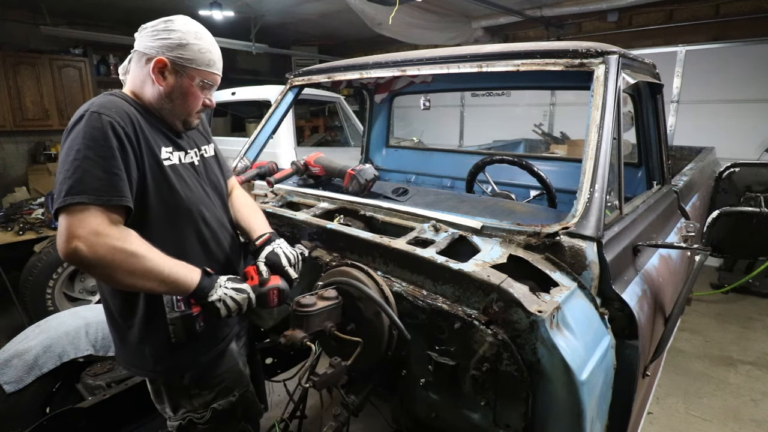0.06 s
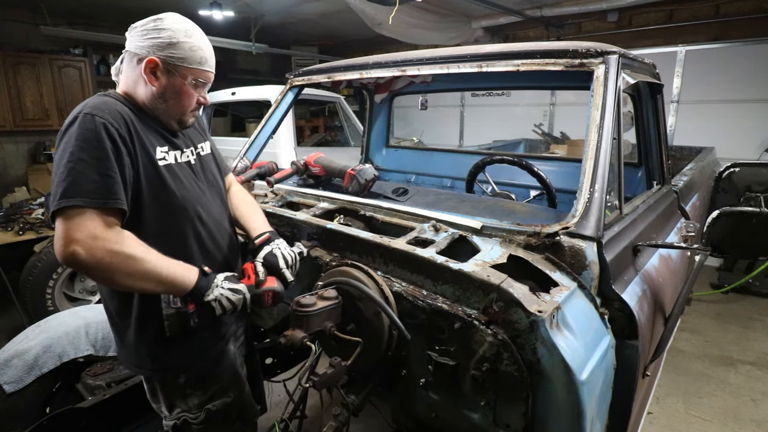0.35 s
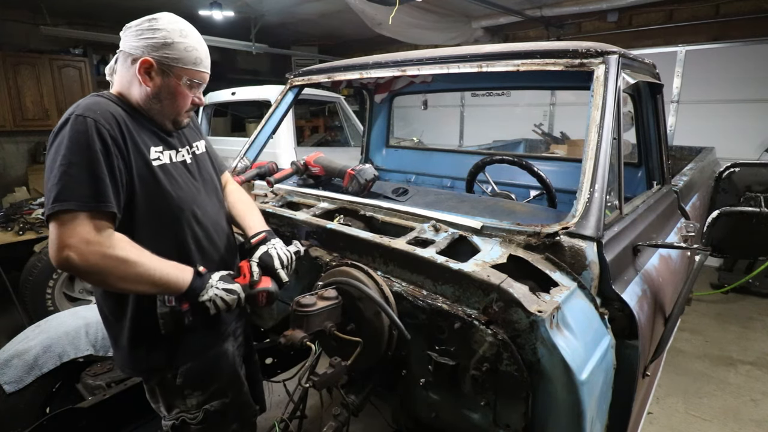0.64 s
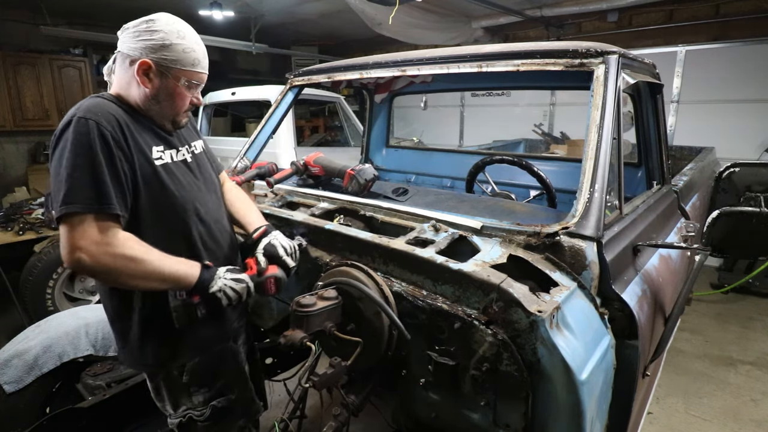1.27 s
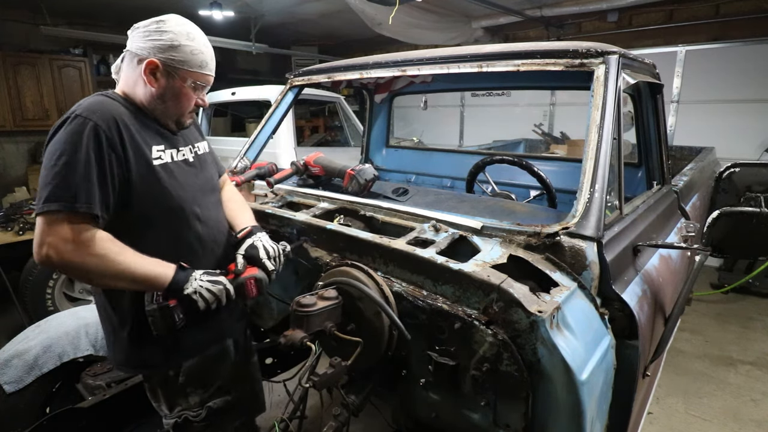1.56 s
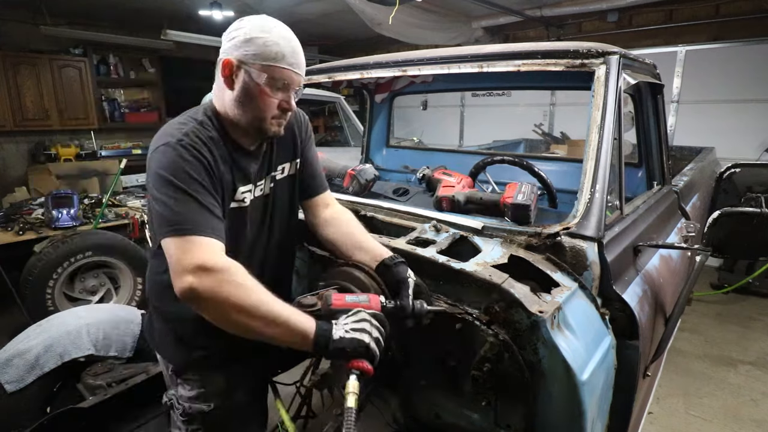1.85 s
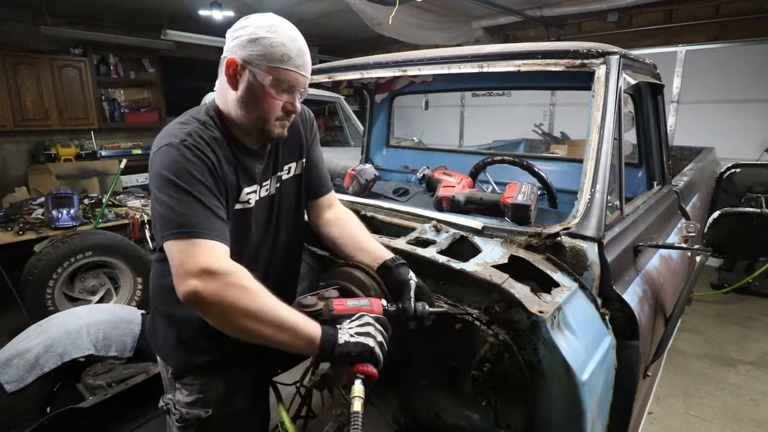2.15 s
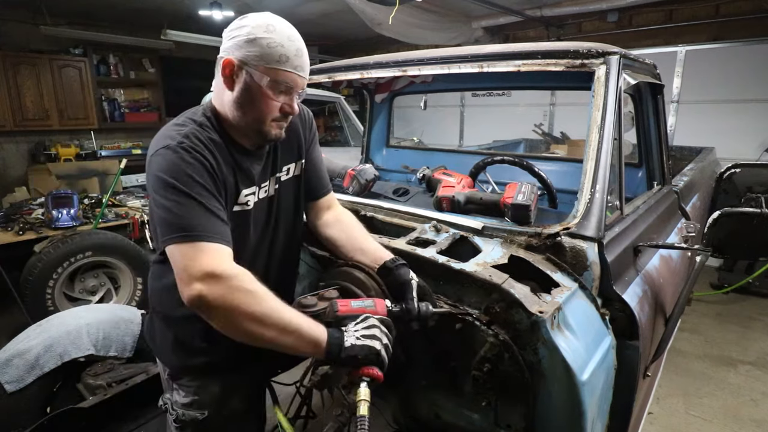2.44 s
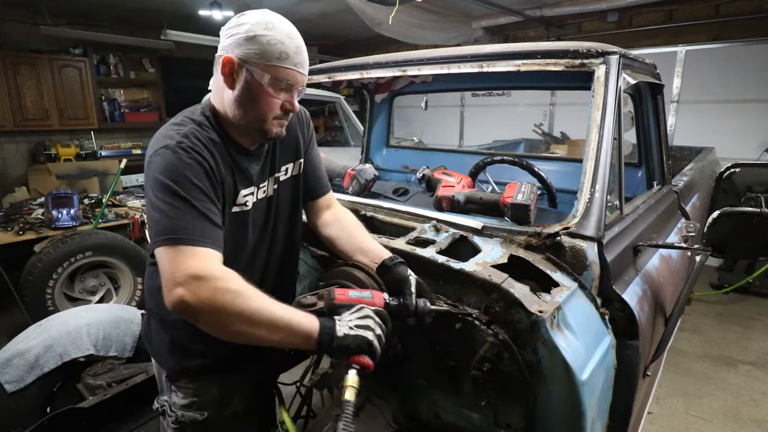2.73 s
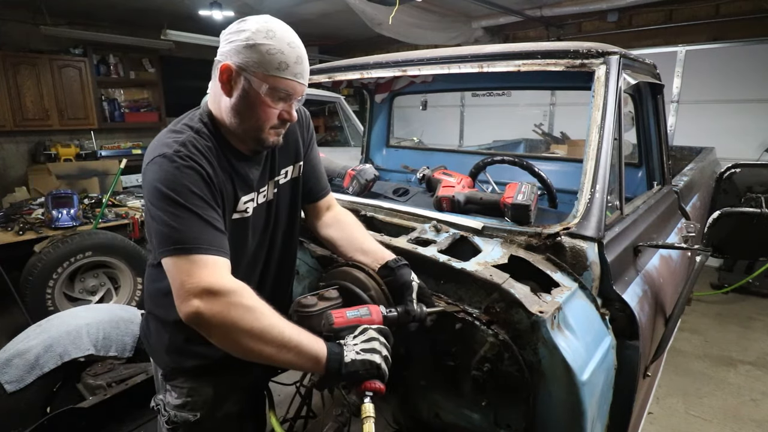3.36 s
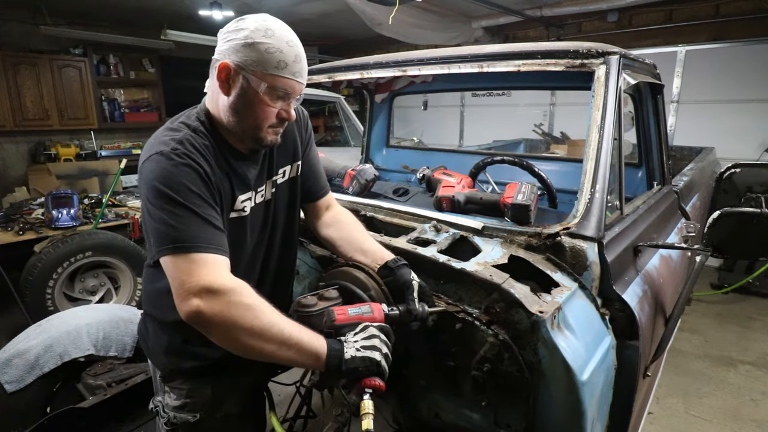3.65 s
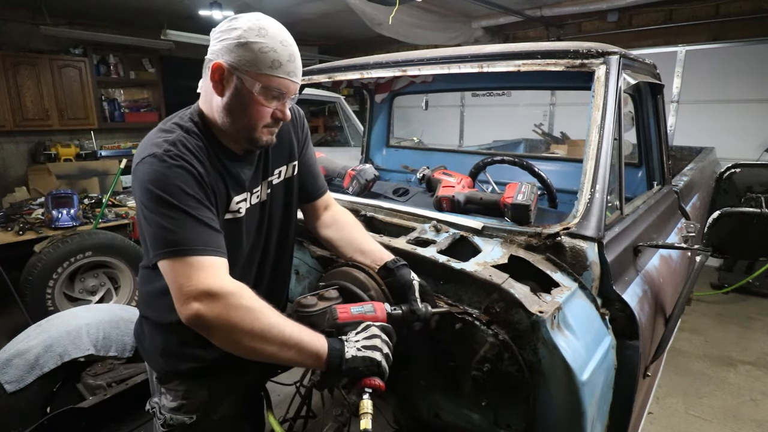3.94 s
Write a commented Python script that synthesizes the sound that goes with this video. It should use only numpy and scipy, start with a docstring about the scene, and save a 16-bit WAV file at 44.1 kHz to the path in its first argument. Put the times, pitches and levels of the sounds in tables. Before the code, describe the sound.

An air hammer pounding a steel truck panel follows a stretch of sawing in a briefly echoing garage. From the start, a reciprocating saw chatters, rasps and squeals through sheet metal, snags with several knocks from 1.2 seconds and stops near 1.6. The hammer rattles briefly at 2 seconds, again from 2.3 to 2.7, and from 3 to 4, with booming blows, chisel clangs and spits of air.

```python
"""An air hammer drives its chisel into a rusty truck panel in three bursts.
Each blow booms the panel, cracks steel on steel and lets out a puff of air.
Before the hammer, a reciprocating (back-and-forth) saw chatters through sheet steel, snags and runs down.
The garage rings briefly over a faint background rumble, and a limiter rounds off the loudest peaks."""
import sys
import numpy as np
from scipy import signal
from scipy.fft import rfft, irfft
from scipy.io import wavfile
from scipy.ndimage import uniform_filter1d, minimum_filter1d

SR = 44100
rng = np.random.default_rng(int(sys.argv[2]) if len(sys.argv) > 2 else 0)


def output_pcm(signal):
    """Save a mono or channel-first signal as 16-bit PCM at the path in sys.argv[1].

    Samples are clipped to [-1, 1] before scaling.
    """
    pcm = np.clip(np.atleast_2d(signal).T, -1, 1) * 32767
    wavfile.write(sys.argv[1], SR, np.round(pcm).astype(np.int16))


N = 176400
TIME = np.arange(N) / SR

# Table levels are relative. A "tone" says how strong a noise is from bass to treble.
# A fade_s is the time a sound takes to drop by 60 dB.
# Tone of the background: frequency_hz, level_db
BACKGROUND_TONE = [(25, 0), (60, -4.5), (150, 1), (400, -8), (1500, -12), (4000, -22), (15000, -32)]
# How long the garage rings: frequency_hz, fade_s
GARAGE_FADE = [(80, 0.8), (190, 1), (400, 0.56), (800, 0.42), (2000, 0.43), (5000, 0.41), (13000, 0.31)]

# How fast the saw runs: time_s, strokes_per_s
SAW_SPEED = [(0, 41.3), (.3, 40.8), (.5, 38.7), (.75, 38), (1.08, 37.9), (1.2, 35.3), (1.3, 34),
             (1.45, 33.5), (1.6, 24)]
# How loud the parts of the sawing are: time_s, rumble_db, squeal_db, rasp_db
SAW_LEVELS = [(0, -18, -22.5, -24.5), (.12, -23, -13.5, -23), (.3, -20, -18, -24.5),
              (.36, -22.5, -18, -26.5), (.56, -22, -17.5, -24.5), (.65, -20, -14.5, -25),
              (.78, -19, -16, -25), (1.16, -22, -15, -28), (1.28, -19.5, -27, -28), (1.4, -17, -20, -25),
              (1.43, -32, -43, -32), (1.48, -24.5, -44, -25), (1.53, -26, -67, -29.5),
              (1.58, -37, -19, -40)]
# The squealing blade: time_s, pitch_hz
SQUEAL_PITCH = [(0.0, 1120), (0.15, 1108), (0.29, 1086), (0.42, 1100), (0.55, 1003), (0.65, 1070),
                (0.71, 1173), (0.93, 1073), (1.08, 1113), (1.17, 1007), (1.4, 980)]
# How loud the blade ticks: time_s, level_db
TICK_LEVEL = [(0, -28), (.25, -35), (.5, -26), (.74, -29.5), (1.05, -27), (1.35, -20), (1.5, -29)]
# Notes the sawn sheet likes to ring at: pitch_hz, width_hz, level_db
SHEET_NOTES = [(327.5, 32, 3), (417, 19, 1), (483, 54, -8), (594, 47, -5), (994, 17, 4), (1150, 11, -6)]
# The blade snags and knocks: start_s, thud_db, clash_db
SNAGS = [(1.1522, -5.5, -5), (1.2049, -3, -2), (1.2711, -14, -19), (1.332, -11, -10.5), (1.381, -8.5, -3),
         (1.4376, -5.5, -10), (1.563, -14, -11), (1.6056, -9.5, -6), (1.659, -28, -22), (1.8348, -28, -37)]
# Short notes ring from the sheet; a low hum lingers in the garage after the saw stops:
# start_s, pitch_hz, level_db, fade_s
RINGING_NOTES = [(1.308, 583, -9, 0.1), (1.441, 527, -9.5, 0.034), (1.46, 205, -14.5, 0.061),
                 (1.612, 533, -16.5, 0.13), (1.69, 163, -40, 0.46), (1.838, 556, -39, 0.12)]
# Tones of the sawing noises: frequency_hz, level_db
RUMBLE_TONE = [(35, -41), (55, -35), (85, -7.5), (130, -6), (200, 4), (260, -3), (340, -0.5), (600, 4),
               (800, 2.5), (1400, -3), (2000, -34)]  # shaking panel
RASP_TONE = [(700, -28), (1500, -1), (2300, 3.5), (2850, 2), (3100, -3), (3700, -2.5), (5000, -11),
             (6000, -17.5), (7400, -19), (8100, -13.5), (9500, -19), (14000, -28), (16000, -43)]  # dragging teeth
TICK_TONE = [(3000, 4.5), (8000, 3), (11500, 0), (14200, -2), (16000, -17)]  # blade turning back
THUD_TONE = [(50, -34), (110, 5.5), (300, 1.5), (530, 2), (900, -1), (1500, -5.5), (4000, -13), (6000, -28),
             (16000, -57)]  # dull part of a snag
CLASH_TONE = [(500, -9), (2000, 6), (4200, 10), (6000, -1), (8500, -0.5), (12000, -5), (14200, -11),
              (16000, -16)]  # bright part of a snag

# The trigger lets air in: start_s, level_db
AIR_SPITS = [(1.98, -17), (2.245, -25), (2.998, -22)]
# The air valve chirps: start_s, pitch_hz, level_db
VALVE_CHIRPS = [(1.988, 1420, -22.5), (2.017, 1460, -23), (2.245, 1550, -22.5), (3.004, 1020, -24.5),
                (3.039, 1080, -15)]
# The chisel clicks in its holder: start_s, level_db
CHISEL_CLICKS = [(2.1984, -10), (2.7584, -7)]
# The chisel clangs when it is not pressed home: start_s, level_db
CHISEL_CLANGS = [(2.0036, -3), (2.034, -9), (2.1224, 0), (2.264, -0.5), (2.702, -4.5), (3.023, 2.5),
                 (3.058, -7), (3.248, -2)]
# Notes of the loose chisel: pitch_hz, level_db, fade_s
CHISEL_NOTES = [(760, -3.5, 0.032), (1188, -18, 0.061), (1630, -20, 0.022), (2580, -20, 0.018)]
# Notes of the hammered panel: pitch_hz, level_db, fade_s
PANEL_NOTES = [(127.5, -16, 0.043), (219.3, 1, 0.062), (362, -5.5, 0.034), (407, -11.5, 0.064),
               (439.3, -5, 0.048), (639, -10, 0.072), (760, -4.5, 0.027), (1266, -23, 0.17)]
# Hammer speed, one list for each burst: time_s, blows_per_s
HAMMER_BURSTS = [
    [(2.0037, 35.6), (2.032, 37.3), (2.059, 36.8), (2.086, 30.6), (2.125, 30)],
    [(2.2619, 34.1), (2.291, 36.6), (2.4, 36.8), (2.452, 43.5), (2.475, 44.2), (2.566, 44.2), (2.612, 39.7),
     (2.665, 30.7), (2.705, 30)],
    [(3.0214, 28.9), (3.056, 32.5), (3.149, 32.1), (3.212, 29.2), (3.247, 31.8), (3.278, 39), (3.33, 40.9),
     (3.452, 39.9), (3.477, 36.5), (3.56, 35.3), (3.73, 35.2), (3.84, 37), (3.87, 39), (4, 39.3)],
]
# How hard the blows land: time_s, boom_db, crack_db
BLOW_FORCE = [(2.0, 0, -2.5), (2.04, -3, -6), (2.085, 2, -1), (2.12, -7, -5), (2.26, -8.5, -7),
              (2.3, 3, -5.5), (2.46, 3.5, -1), (2.66, 3.5, -3), (2.7, -4, -7), (3.02, -1, -2.5),
              (3.06, 2.5, -6), (3.24, 3, -4.5), (3.32, 3.5, -3.5), (3.7, 3.5, -3.5), (4, 0, -2)]
# How much of the noise repeats from blow to blow: frequency_hz, share_0_to_1
REPEAT_SHARE = [(500, 0.86), (1200, 0.55), (3000, 0.25), (8000, 0.05)]
# Tones of the hammer's noises: frequency_hz, level_db
CLICK_TONE = [(150, 14.5), (750, 7.5), (2000, 2), (4200, -5.5), (6000, -1), (8000, -4.5), (11100, 2),
              (11900, -11), (16000, -11)]  # chisel in its holder
CLANG_TONE = [(250, 1), (780, 2), (1050, 3), (1600, -3.5), (4000, -11), (16000, -24)]  # noisy part of a clang
CLATTER_TONE = [(60, -40), (150, -20), (300, 0), (450, 2.5), (800, 3.5), (1100, -2), (1800, -4),
                (4000, -10.5), (5500, -15.5), (16000, -28)]  # struck panel
PING_TONE = [(2500, -1), (4500, -4.5), (9000, 12.5), (16000, -1)]  # piston meeting the chisel
CRACK_TONE = [(800, 8.5), (2500, -11), (4200, 10), (5500, -14.5), (6500, 0.5), (8000, 6), (10500, 2),
              (12500, 2.5), (15700, 3)]  # steel on steel
EXHAUST_TONE = [(500, -2), (1300, 29.5), (2500, -9), (5500, 3), (12000, -23.5), (15700, 2)]  # air going out
SPIT_TONE = [(100, 9), (800, 7.5), (1400, 5), (2200, -4),  # air coming in
             (5000, -9), (6500, -4), (9000, -6), (16000, -12)]


def amp(db):
    """Turns decibels into a number to multiply a sound by."""
    return 10 ** (np.asarray(db) / 20)


def evened(x):
    """Scales a sound to an average (rms) level of 1."""
    return x / np.sqrt(np.mean(x ** 2) + 1e-20)


def curve(rows, t, column=1):
    """Reads one column of a table at time t, sliding between rows."""
    rows = np.array(rows)
    return np.interp(t, rows[:, 0], rows[:, column])


def at_frequency(rows, hz):
    """Reads a table at a frequency, spacing the rows by octaves."""
    row_hz, value = np.transpose(rows)
    return np.interp(np.log(hz + 1), np.log(row_hz), value)


def colour(x, tone):
    """Gives a sound a tone, at an average level of 1."""
    gain = amp(at_frequency(tone, np.fft.rfftfreq(len(x), 1 / SR)))
    return evened(irfft(rfft(x) * gain, len(x)))


def add(mix, start_s, sound):
    """Mixes a sound in at its start time."""
    part = mix[max(round(start_s * SR), 0):][:len(sound)]
    part += sound[:len(part)]


def puff(tone, rise_s, fade_s, size=8192):
    """A burst of noise that rises quickly and dies away."""
    t = TIME[:size]
    return colour(rng.standard_normal(size), tone) * np.minimum(t / rise_s, 1) * 1e3 ** (-t / fade_s)


def ring(notes, size=8192):
    """Pure notes that start at once and die away."""
    t = TIME[:size]
    return sum(amp(db) * 1e3 ** (-t / fade_s) * np.sin(2 * np.pi * hz * t) for hz, db, fade_s in notes)


def resonate(x, pitch_hz, width_hz):
    """Makes a sound ring around a steady or moving pitch."""
    turn = np.exp(2j * np.pi * np.cumsum(np.broadcast_to(pitch_hz, N)) / SR)
    decay = np.exp(-np.pi * width_hz / SR)
    return 2 * (turn * signal.lfilter([1 - decay], [1, -decay], x / turn)).real


def background(level_db=-58):
    """The faint, steady rumble of the quiet garage."""
    return amp(level_db) * colour(rng.standard_normal(N), BACKGROUND_TONE)


def garage(x, echo_db, delay_s):
    """Adds many small echoes; the bass lingers longer than the treble."""
    echoes = np.zeros(SR)
    slots = np.arange(0, SR - 20, 20)
    echoes[slots + rng.integers(0, 20, len(slots))] = rng.choice([-1., 1.], len(slots))
    hz, t, bands = signal.stft(echoes, SR, nperseg=256)
    fade = 1e3 ** (-t / at_frequency(GARAGE_FADE, hz)[:, None])
    tail = signal.istft(bands * fade, SR)[1]
    tail *= np.clip(TIME[:len(tail)] / delay_s - 1, 0, 1)
    return x + amp(echo_db) * signal.fftconvolve(x, tail / np.linalg.norm(tail))[:N]


def sheet_ring(x):
    """The steel sheet rings at its own notes when shaken."""
    return sum(amp(db) * resonate(x, hz, width_hz) for hz, width_hz, db in SHEET_NOTES)


def snags():
    """The blade catches and bangs, short notes ring from the sheet, and a low hum lingers."""
    knocks, notes = np.zeros((2, N))
    for start_s, thud_db, clash_db in SNAGS:
        add(knocks, start_s, amp(thud_db - 8.5) * puff(THUD_TONE, rise_s=0.002, fade_s=0.093))
        add(knocks, start_s, amp(clash_db - 14) * puff(CLASH_TONE, rise_s=0.00075, fade_s=0.063))
    for start_s, hz, db, fade_s in RINGING_NOTES:
        add(notes, start_s, ring([(hz, db, fade_s)]))
    return notes + knocks + amp(-6.5) * sheet_ring(knocks)


def scrape(strokes, alike, depth, size=1024):
    """Teeth drag over the edge, out and back, partly the same way on every stroke."""
    pattern = evened(irfft(np.exp(2j * np.pi * rng.random(size // 2 + 1))))
    repeating = evened(np.interp(strokes % 1, np.arange(size) / size, pattern))
    friction = np.sqrt(alike) * repeating + np.sqrt(1 - alike) * rng.standard_normal(N)
    blade_speed = abs(np.sin(2 * np.pi * strokes))
    return friction * (1 - depth + depth * blade_speed ** 2)


def saw(stop_s=1.57, release_s=0.02):
    """The strokes shake the panel and make the blade squeal, rasp and tick."""
    strokes = np.cumsum(curve(SAW_SPEED, TIME)) / SR - 0.41  # starts partway through a stroke
    rumble_db, squeal_db, rasp_db = (curve(SAW_LEVELS, TIME, column) for column in (1, 2, 3))
    rumble = amp(rumble_db - 0.5) * colour(scrape(strokes, alike=0.32, depth=0.3), RUMBLE_TONE)
    pitch_hz = curve(SQUEAL_PITCH, TIME)
    blade = resonate(scrape(strokes, alike=0.2, depth=0.63), pitch_hz, width_hz=156)
    squeal = amp(squeal_db - 2.5) * evened(resonate(blade, pitch_hz, width_hz=430))
    rasp = amp(rasp_db + 0.5) * colour(scrape(strokes, alike=0.16, depth=0.42), RASP_TONE)
    ticks = np.zeros(N)
    whole_strokes = np.floor(strokes[:round(stop_s * SR)])
    for start_s in np.flatnonzero(np.diff(whole_strokes)) / SR:
        tick_db = curve(TICK_LEVEL, start_s) + 2 * rng.standard_normal()
        add(ticks, start_s, amp(tick_db) * puff(TICK_TONE, rise_s=0.0015, fade_s=0.035))
    shaking = rumble + squeal
    running = np.exp(-np.maximum(TIME - stop_s, 0) / release_s)
    return (amp(-1.5) * (shaking + sheet_ring(shaking)) + rasp + ticks) * running


def handling():
    """Air spits in as the trigger opens; the chisel clicks when the hammer is eased off."""
    out = np.zeros(N)
    for start_s, db in AIR_SPITS:
        add(out, start_s, amp(db) * puff(SPIT_TONE, rise_s=0.011, fade_s=0.077))
    for start_s, db in CHISEL_CLICKS:
        add(out, start_s, amp(db - 7) * puff(CLICK_TONE, rise_s=0.00038, fade_s=0.039))
    return out


def valve_chirps(length_s=0.0094, climb_share=0.081):
    """The air valve gives short, rising hoots while the piston gets going."""
    out, t = np.zeros(N), np.arange(0, length_s, 1 / SR)
    for start_s, hz, db in VALVE_CHIRPS:
        cycles = np.cumsum(hz * (1 + climb_share * (t / length_s - 0.5))) / SR
        add(out, start_s, amp(db) * np.hanning(len(t)) * np.sin(2 * np.pi * cycles))
    return out


def chisel_clangs():
    """The chisel rings freely when it is not pressed home."""
    out = np.zeros(N)
    for start_s, db in CHISEL_CLANGS:
        add(out, start_s, amp(db - 7.5) * ring(CHISEL_NOTES))
        add(out, start_s, amp(db - 17) * puff(CLANG_TONE, rise_s=0.0014, fade_s=0.096))
    return out


def panel_boom(start_s, phases, swell_db=3, swells_per_s=1.7, rise_s=0.0037):
    """The struck panel booms; its upper notes swell and fade as the chisel creeps along."""
    hz, db, fade_s = np.transpose(PANEL_NOTES)
    depth_db = swell_db * np.minimum(hz / np.median(hz), 1) ** 2
    creep_db = depth_db * np.sin(2 * np.pi * (swells_per_s * start_s + phases))
    boom = ring(zip(hz, db + creep_db, fade_s))
    return boom * np.minimum(TIME[:len(boom)] / rise_s, 1)


def blow_times():
    """Each blow follows the last by one piston cycle."""
    for burst in HAMMER_BURSTS:
        start_s = burst[0][0]
        while start_s < burst[-1][0]:
            yield start_s
            start_s += 1 / curve(burst, start_s)


def blow_noises():
    """The panel's dense clatter and the crack of piston on chisel."""
    return np.array([puff(CLATTER_TONE, rise_s=0.0001, fade_s=0.073),
                     puff(CRACK_TONE, rise_s=0.00038, fade_s=0.021)])


def next_blow(usual):
    """The bass of a blow mostly repeats; its treble is new every time."""
    share = at_frequency(REPEAT_SHARE, np.fft.rfftfreq(usual.shape[1], 1 / SR))
    return irfft(np.sqrt(share) * rfft(usual) + np.sqrt(1 - share) * rfft(blow_noises()))


def air_hammer(push_s=0.0006, strike_s=0.0029, vent_s=0.012):
    """Each blow pushes the panel, cracks on the chisel and vents air, at these delays."""
    direct, roomy = np.zeros((2, N))  # the roomy part will get more echo
    usual, phases = blow_noises(), rng.random(len(PANEL_NOTES))
    for start_s in blow_times():
        boom_db, crack_db = (curve(BLOW_FORCE, start_s, column) for column in (1, 2))
        clatter, crack = next_blow(usual)
        add(direct, start_s + push_s, -amp(boom_db - 12) * panel_boom(start_s, phases))
        add(roomy, start_s + push_s, amp(boom_db - 18.5) * clatter)
        add(roomy, start_s + push_s, amp(crack_db - 20.5) * puff(PING_TONE, rise_s=0.0003, fade_s=0.0057))
        add(roomy, start_s + strike_s, amp(crack_db - 12.5) * crack)
        ping_db = crack_db - 8 + 1.7 * rng.standard_normal()
        add(direct, start_s + strike_s, amp(ping_db) * puff(PING_TONE, rise_s=0.0001, fade_s=0.0034))
        exhaust = puff(EXHAUST_TONE, rise_s=0.00088, fade_s=0.039)
        add(roomy, start_s + vent_s, amp(crack_db - 20) * exhaust)
    return direct, roomy


def scene(saw_cut_s=1.875):
    """The saw and its echo cut off, then the hammer starts, all over the quiet of the garage."""
    sawing = garage(saw(), echo_db=-7, delay_s=0.0043) + garage(snags(), echo_db=-11, delay_s=0.0042)
    sawing *= np.clip((saw_cut_s - TIME) * 200, 0, 1)
    direct, roomy = air_hammer()
    roomy += chisel_clangs()
    hammering = garage(direct, echo_db=-13, delay_s=0.013)
    hammering += garage(roomy + handling() + valve_chirps(), echo_db=-5, delay_s=0.0061)
    return (background() + sawing + hammering)[None]


def record(dry, low_cut_hz=90.3, limit_db=-6, hold_s=0.004, high_cut_hz=15850):
    """Removes deep bass, turns loud peaks down, then removes the highest treble."""
    x = signal.sosfilt(signal.butter(6, low_cut_hz, "high", fs=SR, output="sos"), dry)
    gain = np.minimum(1, amp(limit_db) / (abs(x) + 1e-9))
    hold = round(hold_s * SR)
    limited = x * uniform_filter1d(minimum_filter1d(gain, hold), hold)
    high_cut = signal.firwin(511, high_cut_hz, window=("kaiser", 9), fs=SR)
    return signal.oaconvolve(limited, high_cut[None], "same")


dry = scene()
out = record(dry)
output_pcm(out)
```